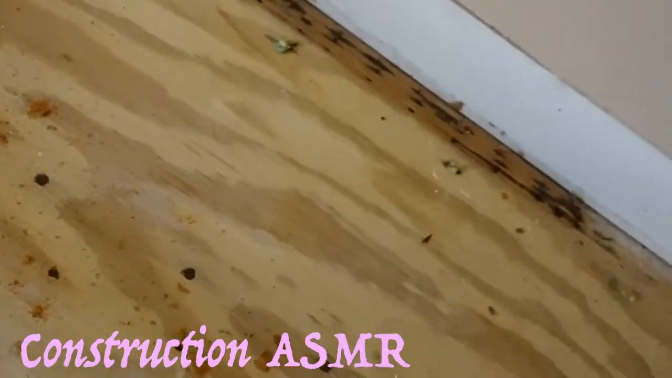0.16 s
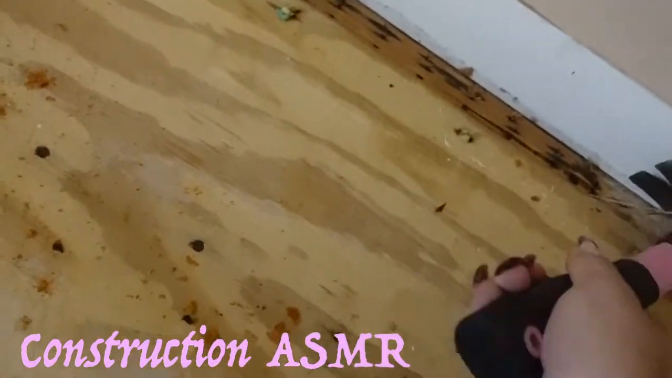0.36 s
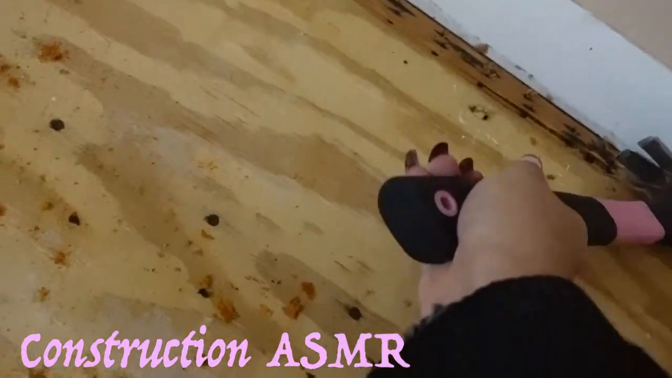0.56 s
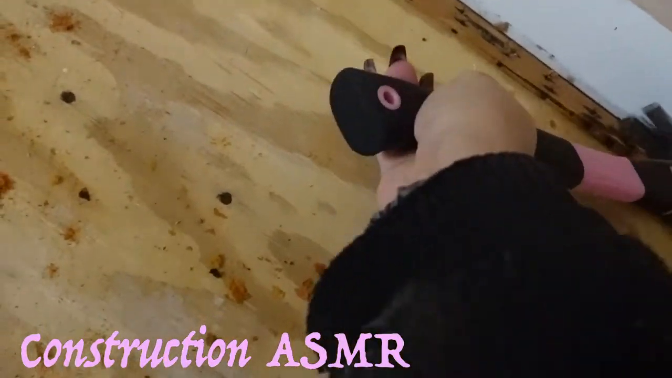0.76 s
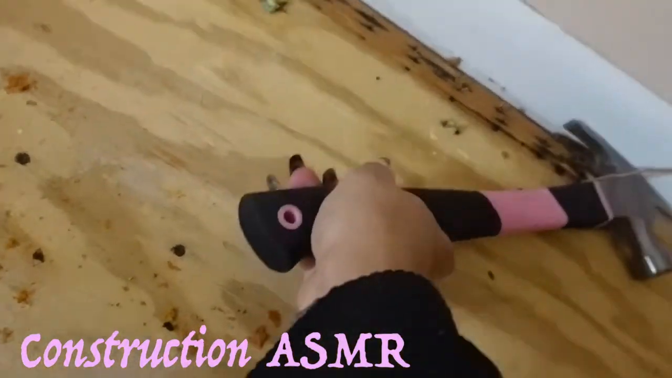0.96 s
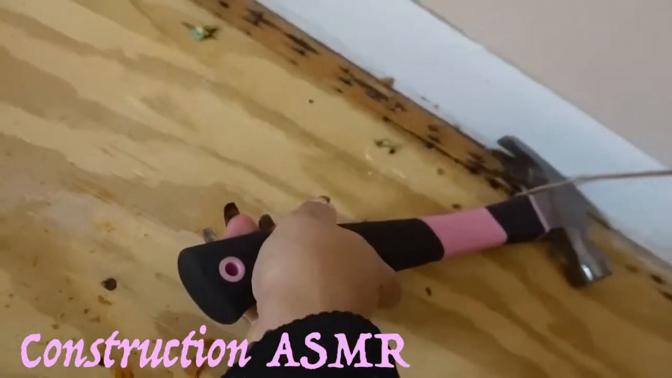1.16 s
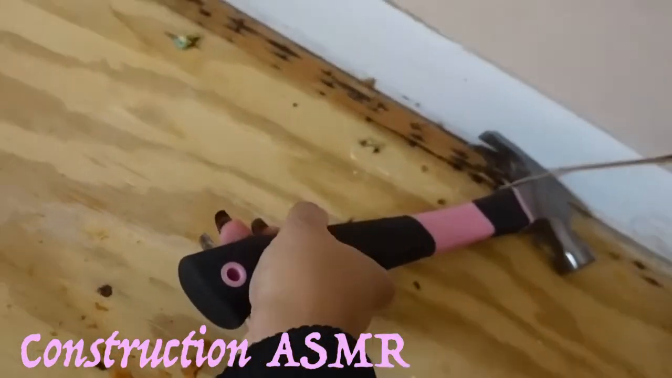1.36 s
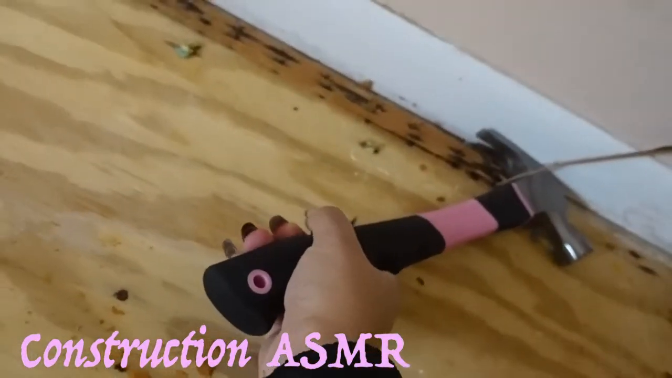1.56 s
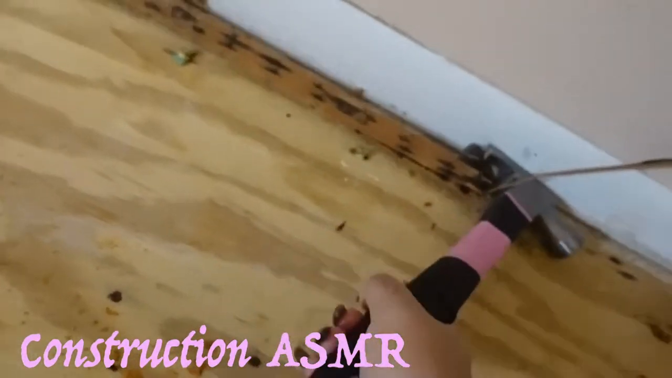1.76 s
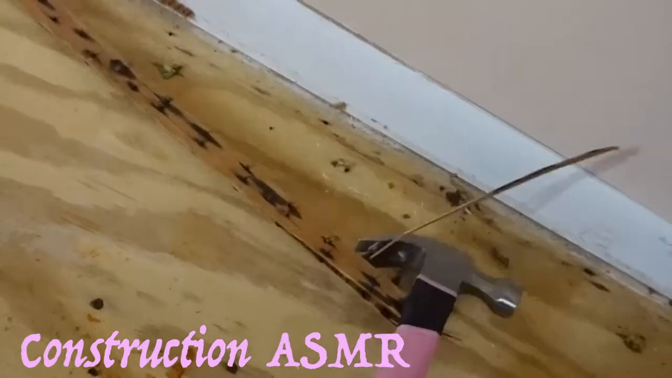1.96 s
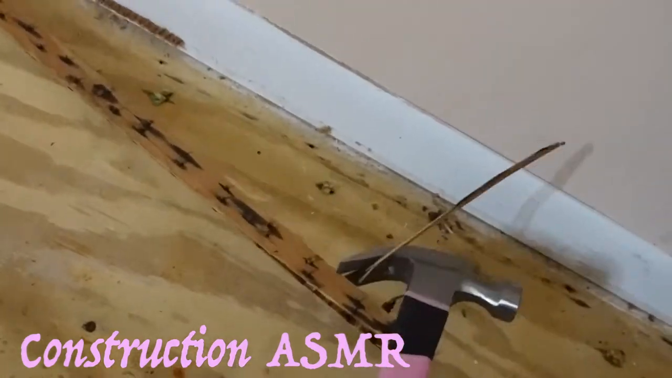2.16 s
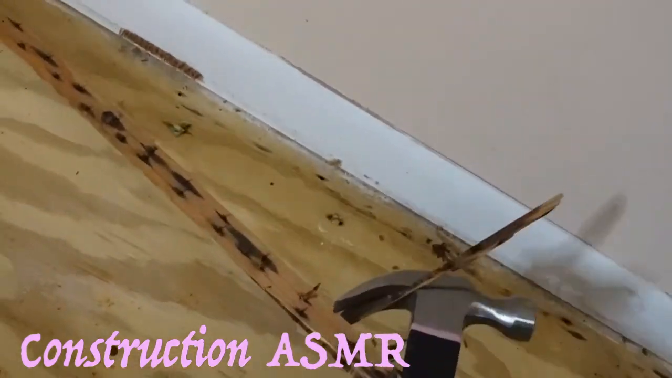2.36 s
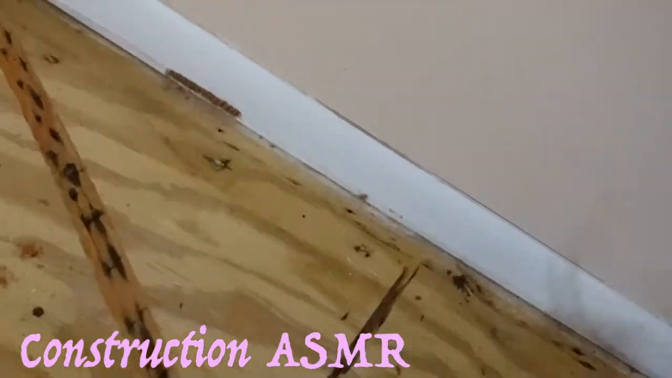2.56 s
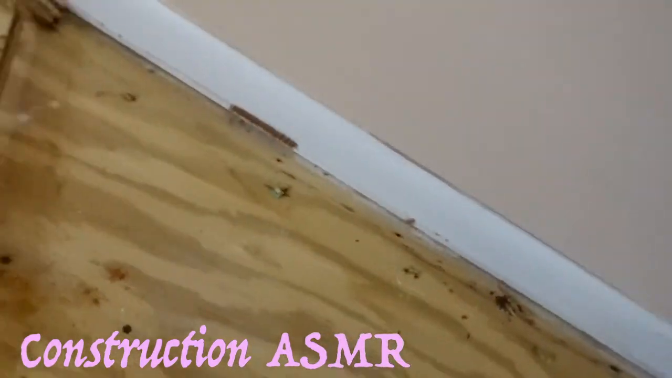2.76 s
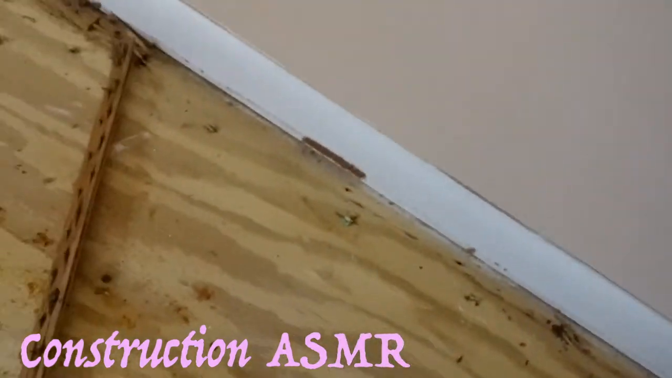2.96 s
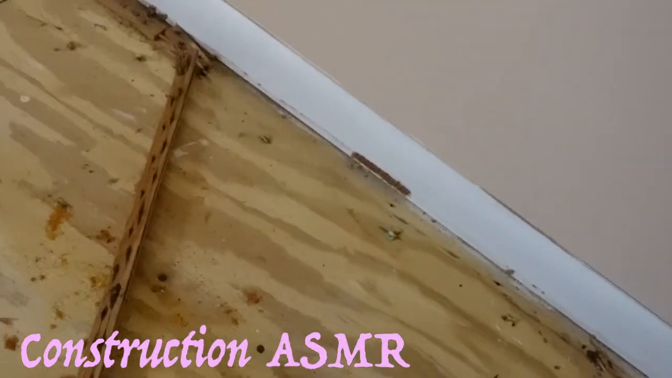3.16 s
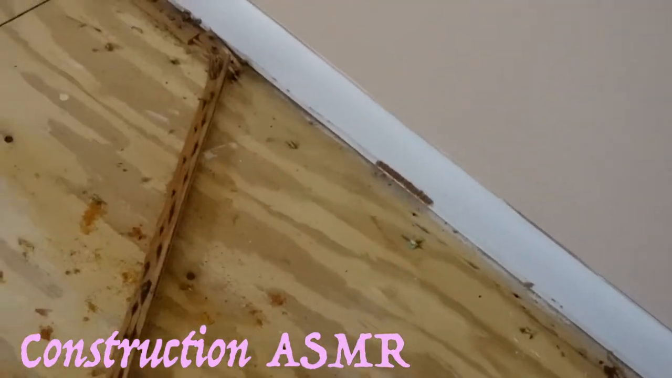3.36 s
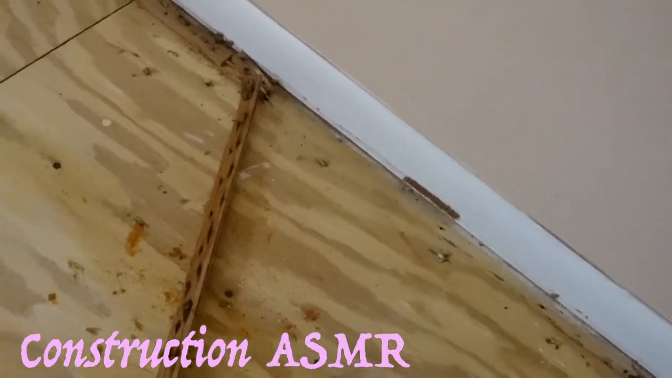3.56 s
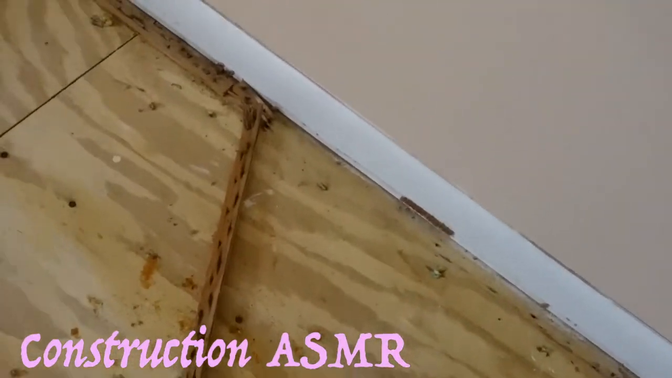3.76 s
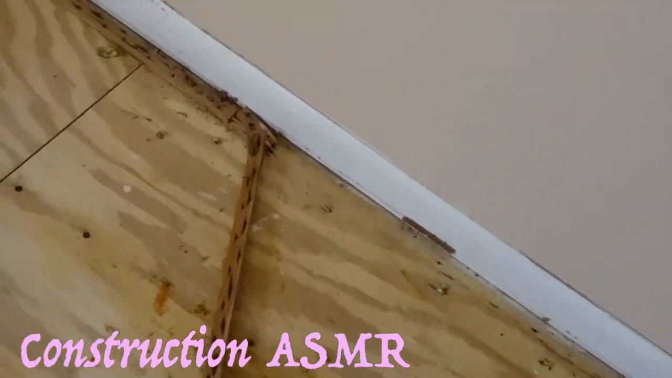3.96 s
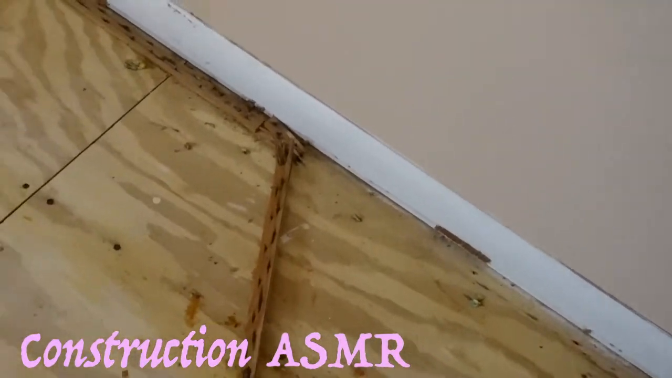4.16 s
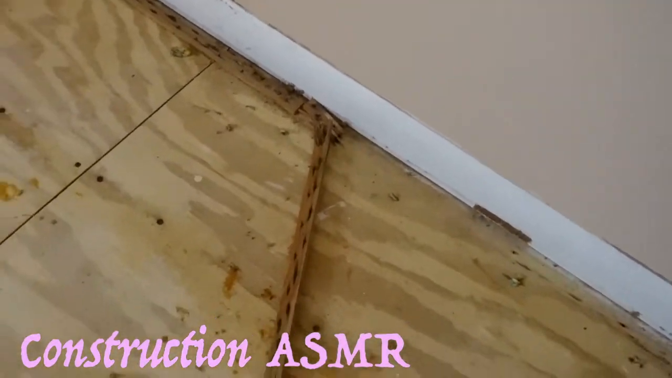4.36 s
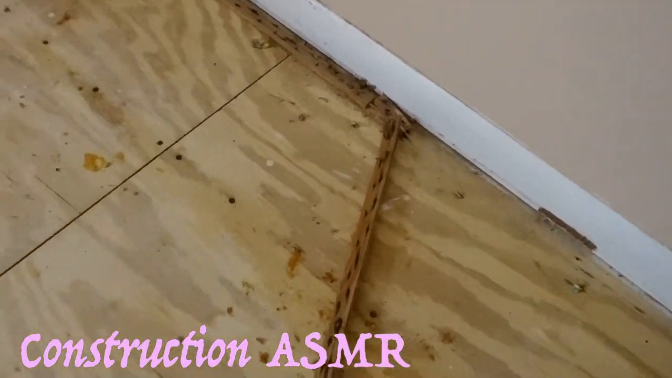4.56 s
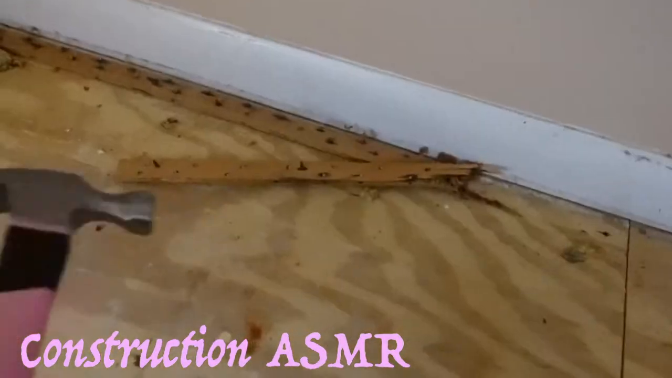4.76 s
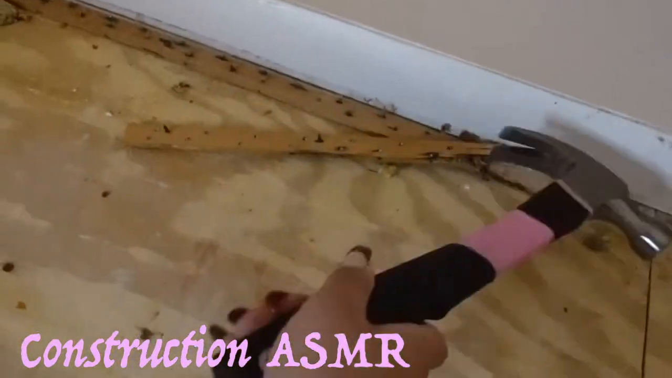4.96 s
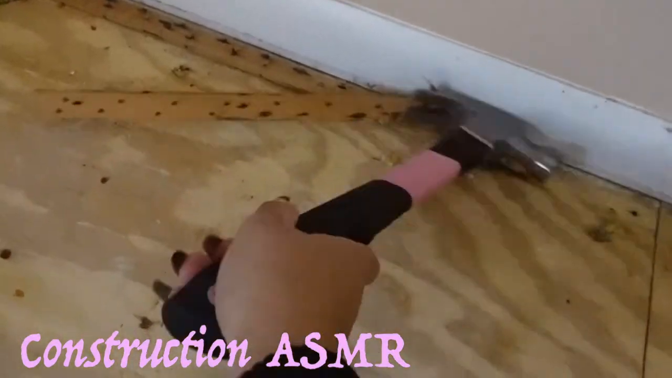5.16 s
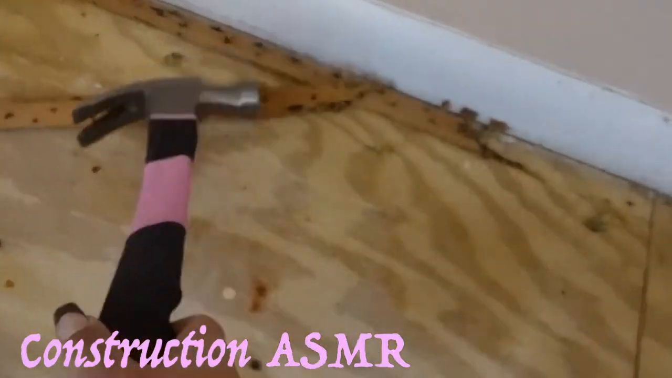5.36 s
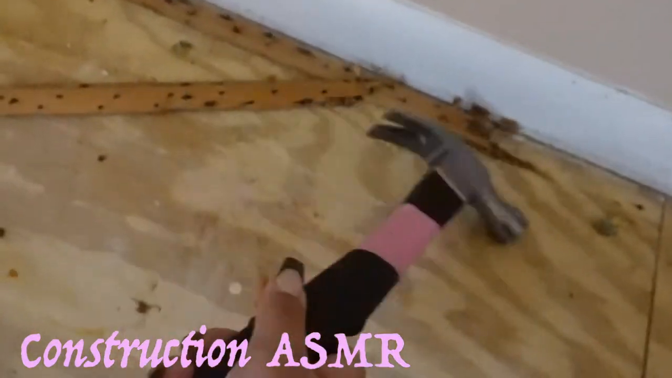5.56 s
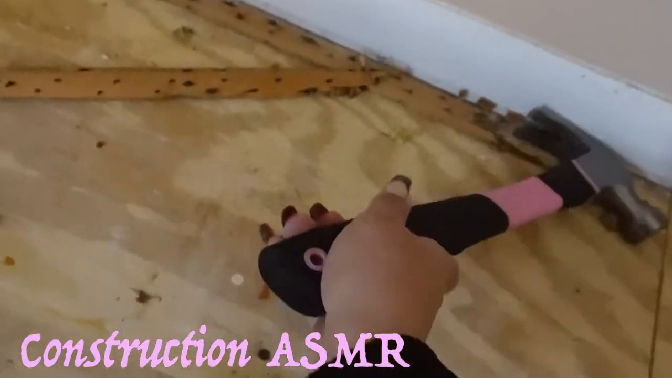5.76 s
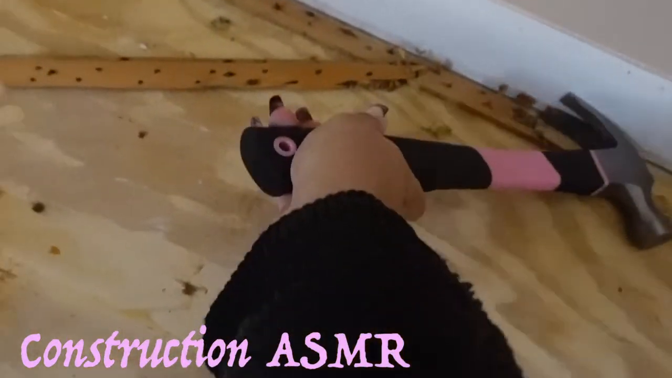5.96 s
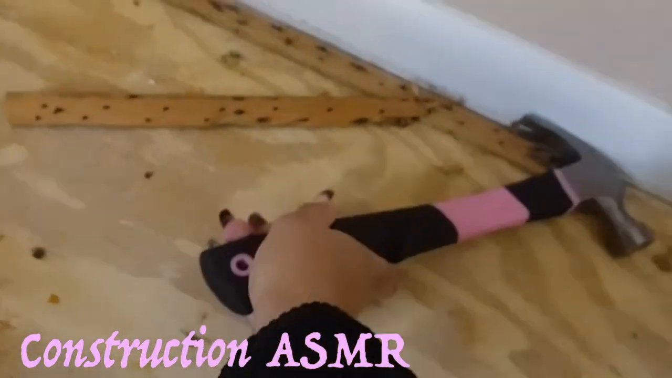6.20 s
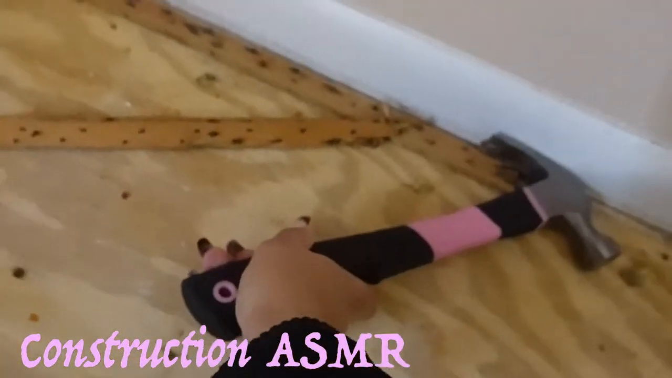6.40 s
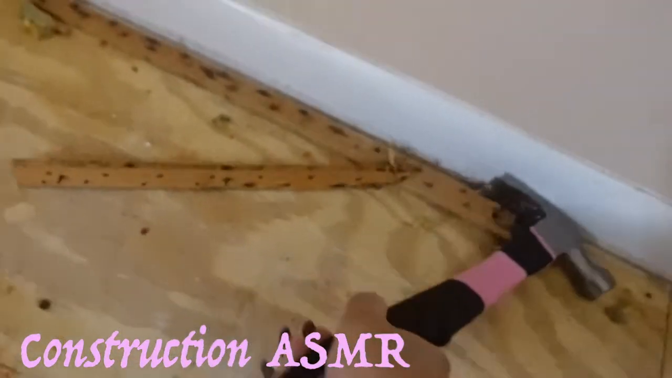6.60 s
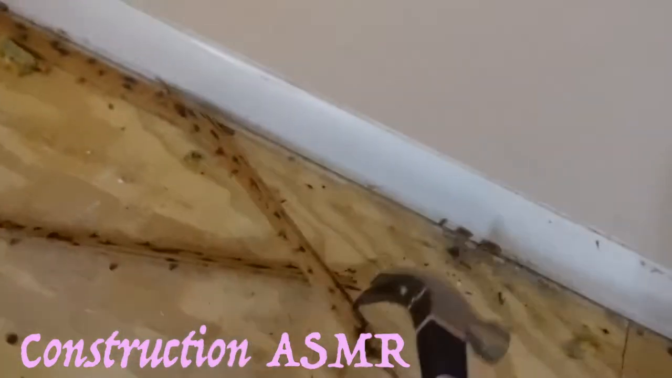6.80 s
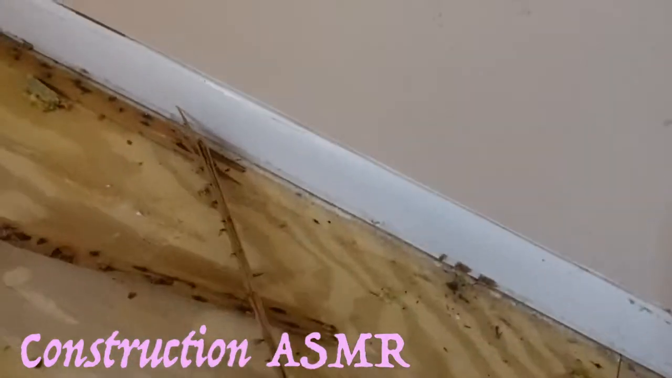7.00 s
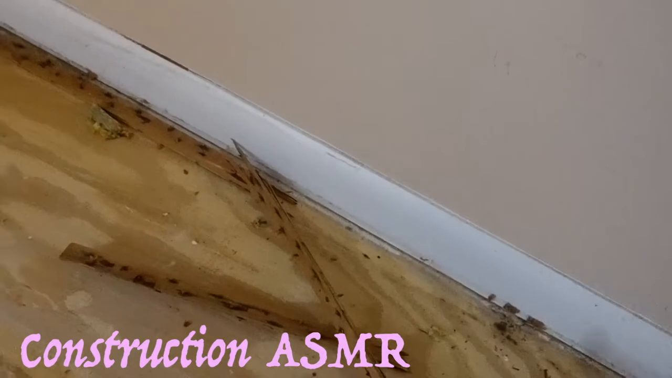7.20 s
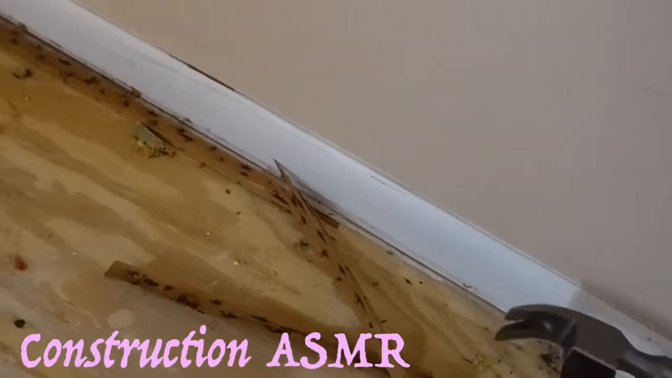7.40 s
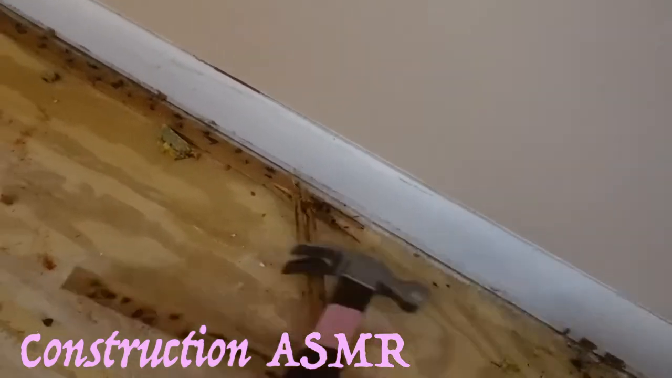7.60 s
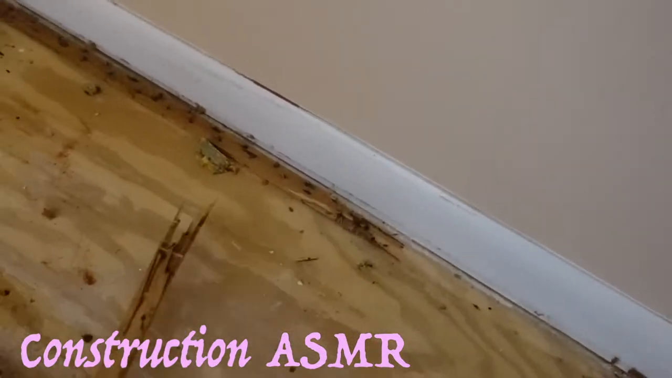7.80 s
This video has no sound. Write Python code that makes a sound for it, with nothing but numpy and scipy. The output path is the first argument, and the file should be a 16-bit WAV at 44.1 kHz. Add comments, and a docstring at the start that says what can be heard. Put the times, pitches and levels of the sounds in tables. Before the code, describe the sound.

A claw hammer knocks and pries a nailed wooden strip off a plywood floor, wood cracking, splintering and groaning in a bare room.

```python
"""Two faint clicks of parting wood fibre stand over a faint steady hiss; then the first blow meets the boards.
A claw hammer jammed under a nailed wooden strip levers it off a plywood floor, close to a phone.
Blows ring decaying board modes; fibres snap singly, then tear in dense random bursts filtered by the strip.
Steel and strip scrape along the floor, bent wood groans as narrow-band noise, and a low hum comes and goes.
The bare room answers with a short noise tail whose treble dies first."""
import sys
import numpy as np
from scipy import signal
from scipy.fft import rfft, irfft, next_fast_len
from scipy.io import wavfile
from scipy.ndimage import uniform_filter1d

SR = 44100
rng = np.random.default_rng(int(sys.argv[2]) if len(sys.argv) > 2 else 0)


def transcribe(signal):
    """Save signal, clipped to [-1, 1], as a 16-bit WAV file at the path in sys.argv[1]."""
    frames = np.atleast_2d(signal).T
    limited = np.clip(frames, -1, 1)
    pcm = np.round(limited * 32767).astype(np.int16)
    wavfile.write(sys.argv[1], SR, pcm)


N = 345744
# modes of the plywood boards: f/Hz, relative level/dB, t60/s
BOARD_MODES = [(62, -26, .15), (84, -26, 0.2), (128.5, -20, 0.47), (161.3, -5, 0.23), (197, -1, 0.13),
               (264, 1.5, 0.069), (307.5, 4, 0.086), (350, 7.5, 0.058), (420.6, 10, 0.03),
               (510.6, 6, 0.032), (609, 1, 0.052)]
# modes of the wooden strip and hammer head: f/Hz, relative level/dB, t60/s
STRIP_MODES = [(806, 1, 0.011), (1095, 3.5, 0.0071), (1259, -3, 0.021), (1440, 0.5, 0.0099),
               (1730, 2.5, 0.0078), (2038, -0.5, 0.011), (2288, 2.5, 0.0062), (2724, 5, 0.005),
               (3120, 0.5, 0.0081), (4205, 5.5, 0.0022), (5100, -65, 0.0027)]
OPPOSITE = np.array([[1], [-1]])  # a side signal enters the two channels in opposite sense


def undb(db):
    """Amplitude ratio of a level: twenty decibels to each factor of ten."""
    return 10 ** (np.asarray(db) / 20)


def unit(x):
    """Normalisation by effective value: scale to rms 1."""
    return x / np.sqrt(np.mean(x ** 2))


def colour(x, points):
    """Spectral shaping: weight by (f/Hz, level/dB) points joined on a log-frequency axis."""
    hz, db = np.transpose(points)
    size = next_fast_len(len(x))
    f = np.maximum(np.fft.rfftfreq(size, 1 / SR), 1)
    gain = undb(np.interp(np.log(f), np.log(hz), db))
    return irfft(rfft(x, size) * gain, size)[:len(x)]


def ring(modes, weight_db=0, phase=0):
    """Modal superposition: an impulse response is a sum of exponentially decaying sinusoids."""
    hz, db, t60 = np.transpose(modes)[:, :, None]
    t = np.arange(SR // 4) / SR
    decay = np.exp(-np.log(1000) * t / t60)
    waves = np.sin(2 * np.pi * hz * t + np.reshape(phase, (-1, 1))) * decay
    return np.sum(undb(db + np.reshape(weight_db, (-1, 1))) * waves, axis=0)


def add(track, s, sound, peak_db):
    """Linear superposition: mix a sound in at time s, scaled to its peak."""
    i = int(s * SR)
    sound = sound[:N - i]
    track[i:i + len(sound)] += sound * undb(peak_db) / np.max(np.abs(sound))


def grit(rate, spread_db):
    """Random impulse process: slips and breaks at chance moments, a few much larger than the rest."""
    hit = rng.random(N) < rate / SR
    size_db = spread_db * np.minimum(rng.exponential(size=N), 4.)
    return hit * rng.standard_normal(N) * undb(size_db)


def judder(rate, depth_db):
    """Random modulation: a gain glides between chance levels drawn `rate` times a second."""
    k = int(SR / rate)
    steps = np.repeat(rng.standard_normal(N // k + 1), k)
    return undb(depth_db * uniform_filter1d(steps, k)[:N])


def held(rows, rough, edge_s):
    """Narrow-band noise: uneven slips drive a resonance whose strength and phase wander in a band rough * f."""
    out = np.zeros(N)
    for start, end, hz0, hz1, db in rows:
        i = np.arange(int(start * SR), int(end * SR))
        k = int(SR / rough / hz0)
        slips = uniform_filter1d(uniform_filter1d(rng.standard_normal((2, len(i))), k), k)
        turn = 2 * np.pi * np.cumsum(np.linspace(hz0, hz1, len(i))) / SR
        edge = np.clip(np.minimum(i - i[0], i[-1] - i) / SR / edge_s, 0, 1)
        tone = unit(slips[0] * np.sin(turn) + slips[1] * np.cos(turn))
        out[i] += undb(db) * edge * tone
    return out


def prying():
    """Switched excitation: 1 while wood is torn, 0 while steel and strip only slide."""
    # spells of tearing: start t/s, end t/s
    spells = [(.95, 2.76), (5.1, 5.3), (6.25, 7.12)]
    t = np.arange(N) / SR
    return sum((t >= start) * (t < end) * 1. for start, end in spells)


def strokes(rest_db=-60, swell_db=30, sag_db_per_s=63, fade_db_per_s=263):
    """Exponential envelopes: each stroke's drive rises, tires while held, then dies; overlapping strokes add."""
    # tearing and scraping: start t/s, swell t/s, hold t/s, strip drive level/dB,
    # fine splinter level/dB re strip drive, board rumble level/dB re strip drive
    pulls = [(0.344, 0.0084, 0.0061, -16.5, -19.5, -4), (0.385, .01, 0.16, -18, -31, 3.5),
             (0.582, 0.0046, 0.03, -31.5, 2, 6.5), (0.702, 0.006, 0.057, -34, -10, 5),
             (0.743, 0.0097, .02, -18, -9.5, -3), (.805, .01, 0.032, -22.5, -5.5, -3),
             (0.994, 0.036, 0.14, -47, -1.5, 5), (1.389, 0.0026, 0.0069, -29, 0, -13),
             (1.421, 0.006, 0.065, -32.5, 2, -9.5), (1.542, 0.0096, 0.042, -41.5, 3, -21),
             (1.603, 0.0071, 0.081, -23.5, 2.5, -13.5), (1.645, .15, .03, -10.5, -9, -7.5),
             (1.837, 0.021, 0.21, -10, -16.5, -14), (2.116, 0.0032, 0.01, -27.5, -8.5, -31.5),
             (2.261, 0.004, 0.0092, -30.5, -3.5, -21), (2.323, 0.15, 0.022, -19, 1.5, -33),
             (2.483, 0.0057, 0.016, -20, -1.5, -13), (2.558, 0.014, 0.032, -25, 7, -20),
             (2.63, 0.0085, 0.079, -19.5, -5, -15.5), (2.734, 0.057, 0.12, -3.5, -21.5, -17.5),
             (3.018, 0.004, 0.019, -25.5, -6.5, -42), (3.289, 0.14, 0.11, -38, -2.5, -8),
             (3.745, 0.047, 0.029, -16, -0.5, -27), (3.876, .006, .04, -33.5, -20, -6),
             (4.031, 0.012, 0.13, -30.5, -22, 0), (4.282, .08, .1, -56.5, -9.5, -10),
             (4.669, .005, 0.048, -36.5, -38, -0.5), (5.107, 0.0055, 0.042, -20, -8, -1),
             (5.152, 0.0035, 0.0068, -16, -11, -8.5), (5.204, 0.057, 0.069, -17, -8, -1.5),
             (5.516, 0.0045, 0.005, -30.5, -8.5, 9.5), (5.62, 0.0079, 0.078, -25.5, -10, 1),
             (5.648, 0.031, .03, -21.5, -8.5, -5), (5.786, 0.009, 0.087, -9.5, -17, -2),
             (5.918, 0.062, .045, -23.5, -5.5, -4), (6.044, 0.011, 0.0093, -21.5, 3, -2),
             (6.13, 0.066, 0.015, -27.5, -8.5, -5.5), (6.277, 0.033, .15, -54.5, 6.5, 1.5),
             (6.5, 0.066, 0.25, -16, -3.5, -10.5), (6.754, 0.015, 0.087, -17, -1, -18),
             (6.896, .015, 0.08, -13.5, -10.5, -3), (6.997, 0.034, 0.06, -21.5, -12, -2),
             (7.29, .22, .055, -40, -27, -33), (7.572, 0.035, 0.022, -10, -6.5, -8.5),
             (7.626, 0.027, 0.04, -17, -1, -7), (7.7, 0.014, 0.12, -20.5, -5.5, -3)]
    t = np.arange(N) / SR
    # between strokes the hand only rests on the tool, and the boards are not driven
    out = np.outer(undb(rest_db) * np.array([1, 1, 0]), np.ones(N))
    for s, swell_s, hold_s, db, splinter_db, boards_db in pulls:
        i = slice(int(s * SR), int((s + swell_s + hold_s + .3) * SR))
        since = t[i] - s - swell_s
        rise = swell_db * since / swell_s
        sag = sag_db_per_s * np.minimum(since, hold_s)
        fade = fade_db_per_s * np.maximum(since - hold_s, 0)
        shape = np.where(since < 0, rise, -sag - fade)
        out[:, i] += np.outer(undb([0, splinter_db, boards_db]), undb(db + shape))
    return out


def tearing(gains, spread_oct=1.0):
    """Source-filter principle: dense random breaks excite strip and boards and crackle in the air."""
    # splinter noise: f/Hz, relative spectral level/dB
    splinter_spectrum = [(1470, -34), (2500, 5.5), (2970, 10), (4910, 8.5), (5830, 8), (6350, 6),
                         (14800, -3), (16000, 3)]
    lively_hz, lively_db_per_oct = 2315, 39  # the more splinters fly, the higher the strip speaks
    slide_rough, slide_top_hz = .4, 7000  # sliding is smoother than tearing, and duller

    # the steel catches and lets go, so the force comes in uneven lumps
    force, splinter, rumble = judder(70, 3.1) * gains
    centre_hz = lively_hz * 2 ** (20 * np.log10(splinter / force) / lively_db_per_oct)
    torn = prying()
    rough = slide_rough + (1 - slide_rough) * torn

    breaks = grit(3000, 2.82 * rough) * force
    strip = 0
    for k, mode in enumerate(STRIP_MODES):
        # the free length of strip changes, and with it the modes that speak
        share = undb(-6 * (np.log2(mode[0] / centre_hz) / spread_oct) ** 2)
        tone = signal.oaconvolve(breaks * share, ring([mode])[:SR // 20])[:N]
        strip = strip + (-1) ** k * tone  # neighbours move in opposite sense

    splinters = unit(colour(grit(5000, 3.14 * rough), splinter_spectrum)) * splinter
    dull = signal.sosfilt(signal.butter(1, slide_top_hz, fs=SR, output="sos"), splinters)
    splinters = torn * splinters + (1 - torn) * dull

    shaking = grit(3000, 2.37) * rumble * undb(-31)
    boards = signal.oaconvolve(shaking, ring(BOARD_MODES))[:N]
    return undb(-14.5) * strip + splinters + boards


def snaps(rows, bounce_db=-7, body_db=-14):
    """Impulsive release: a fibre clicks, its stub rings, the floor reflects both and the strip is jolted."""
    out, t = np.zeros(N), np.arange(SR // 60) / SR
    click_s, ring_s, body_s = .00045, .0005, .0074  # time constants
    crisp = signal.butter(2, 4500, "high", fs=SR, output="sos")
    # neighbouring modes in opposite sense
    body = ring(STRIP_MODES, phase=np.pi * np.arange(len(STRIP_MODES)))[:len(t)] * np.exp(-t / body_s)
    for s, peak_db, hz, click_db in rows:
        click = rng.standard_normal(len(t)) * np.exp(-t / click_s)
        stub = np.convolve(click, np.sin(2 * np.pi * hz * t) * np.exp(-t / ring_s))[:len(t)]
        jolt = np.convolve(click, body)[:len(t)]
        bounce_s = rng.uniform(.001674, .002754)
        for lag, db in (0, 0), (bounce_s, bounce_db):
            add(out, s + lag, stub, peak_db + db + 1.5)
            add(out, s + lag, signal.sosfilt(crisp, click), peak_db + db + click_db + 3.5)
        # thick fibres ring low and move the strip more
        add(out, s, jolt, peak_db + body_db - 6 * np.log2(hz / 3000))
    return out


def single_fibres():
    """Isolated impulsive releases: single fibres snap at set moments."""
    # fibres: t/s, peak level/dB before a common offset, stub ring f/Hz,
    # sharp click level/dB re peak before a common offset
    fibres = [(0.062, -38, 3030, 8), (0.0995, -27, 8900, 6), (0.3381, -23, 8900, -8),
              (0.3491, -12.5, 2970, 8.5), (0.4277, -17, 2720, -10), (0.4949, -24.5, 2040, 7.5),
              (0.634, -19.5, 2920, -1), (0.7038, -18.5, 3020, 0), (0.7223, -10.5, 2776, -27),
              (0.876, -21.5, 3250, 8.5), (1.0445, -24, 4370, 3), (1.0685, -16.5, 5740, 3),
              (1.0994, -15, 4300, 3), (1.1638, -28.5, 5730, -12), (1.1897, -20.5, 4800, 2),
              (1.2008, -19, 5320, -4), (1.2176, -20.5, 4800, -4), (1.2735, -16.5, 4950, 5.5),
              (1.2925, -18, 5480, 4.5), (1.3364, -21.5, 5240, 5.5), (1.3713, -16, 5260, 4.5),
              (1.3962, -4, 5530, 3.5), (1.4691, -6.5, 3074, -2), (1.5658, -13.5, 5760, 1),
              (1.5833, -14.5, 9500, -6), (1.5963, -0.5, 4764, -11.5), (1.61, -4, 5043, -9),
              (1.6741, -6, 4880, -13), (1.6975, -8.5, 1999, 1), (1.7145, 1.5, 2950, -11),
              (1.7444, 5, 5020, -5), (1.8813, -3, 3600, -12.5), (1.92, -6, 1920, -1.5),
              (1.9309, 2.5, 2070, 4.5), (1.9694, -1.5, 2075, -3.5), (2.1271, -7, 2200, 5),
              (2.2348, -3, 3220, -0.5), (2.2951, -17, 2003, -8), (2.3109, -16, 4500, 7),
              (2.3341, -10.5, 5610, 1), (2.3511, -10, 6480, -8), (2.3733, -3, 10970, 3),
              (2.38, -2, 5440, 3), (2.3881, -2, 5300, 1.5), (2.4004, -18, 5180, 6.5),
              (2.4164, 2, 7470, 10.5), (2.5167, -7.5, 2980, 6.5), (2.5669, -4, 6755, -9),
              (2.6159, -1, 8715, -1), (2.7519, 3.5, 2346, -8.5), (2.8604, -5, 2520, -16),
              (2.8824, -8, 2170, -18), (2.9094, -17, 2016, -13), (2.9467, -6.5, 4400, -2),
              (3.037, -14.5, 2270, -8), (3.0962, -19, 2070, -9), (3.344, -29.5, 5170, -17.5),
              (4.0442, -22, 2610, -18.5), (5.1068, -19.5, 2890, -7), (5.1208, -11, 4970, -0.5),
              (5.2327, -0.5, 7460, -9), (5.253, -3.5, 2750, 1.5), (5.5243, -13.5, 2160, -7),
              (5.7728, -5, 2020, -18), (6.0771, -6.5, 4230, -4), (6.1809, -11, 2740, -7),
              (6.4079, -27, 5430, -7.5), (6.4146, -26, 9970, -9), (6.4501, -30, 4160, 1),
              (6.5041, -19, 2734, 0.5), (6.5157, -21, 2583, -1.5), (6.5351, -22.5, 10180, 9.5),
              (6.5445, -7, 9920, -4.5), (6.5522, -8, 5330, 5.5), (6.5874, -12, 4060, 1),
              (6.6732, 4.5, 2860, -5.5), (6.7496, -2.5, 3940, 3), (6.8753, 5.5, 6140, -2.5),
              (7.013, 1.5, 5130, -3.5), (7.0764, -12, 3300, -21.5), (7.5797, -13.5, 2330, -13),
              (7.7972, -11, 3460, -2), (7.8251, -4.5, 2250, -24)]
    return snaps(fibres)


def crackle(splinter, strip, count=220):
    """Inhomogeneous random process: small snaps crowd where splinters are loud, less where strip drive is louder."""
    peak_db, spread_db = 13, 1  # re splinter drive
    centre_hz, spread_oct = 5840, 0.59
    density = prying() * splinter ** 0.48 * np.minimum(splinter / strip, 1) ** 0.55
    chance = np.cumsum(density)
    at = np.searchsorted(chance, rng.random(count) * chance[-1])
    size, pitch, sharp = rng.standard_normal((count, 3)).T
    level_db = 20 * np.log10(splinter[at]) + peak_db + spread_db * size
    hz = np.clip(centre_hz * 2 ** (spread_oct * pitch), 2000, 11000)
    return snaps(list(zip(at / SR, level_db, hz, -3 + 5 * sharp)))


def knocks(spread_oct=0.25, tick_s=0.0061, skid_s=0.0066):
    """Modal excitation: a blow rings the board modes nearest its own pitch, with a woody tick at contact."""
    # blows: t/s, first-contact tick peak level/dB before a common offset,
    # thud centre f/Hz, thud peak level/dB before a common offset
    blows = [(0.349, -7, 140, -24), (0.407, -2, 555, -11), (0.43, -28, 365, -8), (0.586, -22, 360, -14),
             (0.723, 1, 193, -15.5), (1.055, -29, 186, -22), (1.674, -21.5, 274.7, -21),
             (1.801, 4, 230, -14.5), (1.825, -1, 193.3, -14), (2.774, 6, 231, -42),
             (3.857, -12.5, 479, -28), (4.044, -14, 119.5, -19), (4.351, -32, 123, -31.5),
             (4.681, -26.5, 342, -53.5), (5.106, -12.5, 252.6, -11.5), (5.154, -13, 153, -15.5),
             (5.206, 4, 168.5, -14.5), (5.231, -2, 147.5, -20), (5.525, -15, 344, -12),
             (5.626, -11.5, 300, -9.5), (5.774, 5.5, 176, -18), (5.799, -11, 150, -13.5),
             (6.057, -6.5, 321, -17), (6.103, -30, 205, -23.5), (6.89, 4, 325, -7.5), (6.924, 2, 365, -12),
             (6.96, -8, 332, -13), (7.58, -0.5, 310, -11.5), (7.7, -4.5, 327, -17.5),
             (7.826, 1.5, 322, -27)]
    out, hz, t = np.zeros(N), np.array(BOARD_MODES)[:, 0], np.arange(SR // 40) / SR
    push = np.hanning(SR // 500)  # the head stays on the wood for a moment
    woody = ring(STRIP_MODES)[:len(t)] * np.exp(-t / tick_s)
    for s, tick_db, centre_hz, thud_db in blows:
        nearness_db = -6 * (np.log2(hz / centre_hz) / spread_oct) ** 2
        weight_db = nearness_db + 2 * rng.standard_normal(len(hz))
        add(out, s, np.convolve(ring(BOARD_MODES, weight_db), push), thud_db + 4.0)
        skid = rng.standard_normal(len(t)) * np.exp(-t / skid_s)
        add(out, s, np.convolve(skid, woody), tick_db - 7.0)
    return out


def groans():
    """Friction-driven resonance: bent wood groans on rough gliding pitches."""
    # groans: start t/s, end t/s, start f/Hz, end f/Hz, rms level/dB before edge fades
    bends = [(.26, .345, 640, 620, -51.5), (1.4, 1.52, 1667, 1695, -44.5), (1.675, 1.76, 1017, 1010, -23),
             (1.86, 2.05, 738, 714, -25.5), (1.89, 1.94, 1917, 1950, -24.5), (5.16, 5.185, 1450, 1516, -17),
             (5.8, 5.885, 1970, 2094, -19.5), (5.96, 6.045, 850, 858, -36.5),
             (5.96, 6.04, 3180, 3250, -31.5), (6.055, 6.09, 810, 987, -27), (6.89, 7.01, 330.7, 321, -21),
             (6.9, 7.1, 642, 620, -29)]
    return held(bends, .2, .012)


def hums():
    """Narrow-band noise at low frequency: a low hum comes and goes."""
    # hums: start t/s, end t/s, start f/Hz, end f/Hz, rms level/dB before edge fades
    spells = [(4.4, 4.62, 77, 76, -44), (4.68, 5.1, 60, 61, -45), (4.9, 5.1, 126.4, 135, -53.5),
              (7.25, 7.58, 108.6, 112, -56.5)]
    return held(spells, 0.42, 0.024)


def room(dry, first_echo_s=0.0063, wet_db=-12.5, side_db=-19):
    """Reverberant decay: bare walls give a noise tail, slightly different at the two microphones."""
    # decay of the bare room: f/Hz, t60/s
    decay_times = [(100, 0.34), (400, 0.67), (1500, 0.69), (4000, 0.39), (12000, 0.25)]
    t, (hz, t60) = np.arange(SR * 3 // 4) / SR, np.transpose(decay_times)
    tails = np.zeros((2, len(t)))
    for centre in 62.5 * 2. ** np.arange(9):  # octave bands, Hz
        octave = [(centre / 2, -40), (centre / 2 ** .5, -3), (centre, 0),
                  (centre * 2 ** .5, -3), (centre * 2, -40)]
        decay = np.exp(-np.log(1000) * t / np.interp(np.log(centre), np.log(hz), t60))
        tails += [colour(rng.standard_normal(len(t)), octave) * decay for _ in range(2)]
    tails *= np.clip(t / first_echo_s - 1, 0, 1)  # silent before the first echo, then rising
    mid, side = (signal.oaconvolve(dry, tail)[:N] / np.sqrt(np.sum(tail ** 2)) for tail in tails)
    return undb(wet_db) * (mid + undb(side_db) * side * OPPOSITE)


def hiss(level_db=-52, side_db=-8.5):
    """Stationary coloured noise: steady air and microphone noise, wavering a little."""
    # noise floor: f/Hz, relative spectral level/dB
    spectrum = [(18, -41.5), (30, -34), (100, -3.5), (364, -11.5), (616, -6.5), (962, -14), (1670, -7.5),
                (1910, -10.5), (2060, -9), (6000, -21.5), (16000, -31)]
    mid, side = (unit(colour(rng.standard_normal(N), spectrum)) for _ in range(2))
    return undb(level_db) * judder(3.41, 0.35) * (mid + undb(side_db) * side * OPPOSITE)


def scene(pan_db=1.12, aside_hz=600):
    """Level-difference stereo: the work lies in front of the phone; only its treble wanders to either side."""
    gains = strokes()
    strip, splinter, _ = gains
    work = tearing(gains) + single_fibres() + crackle(splinter, strip) + knocks() + groans()
    treble = signal.sosfilt(signal.butter(1, aside_hz, "high", fs=SR, output="sos"), work)
    aside = treble * (judder(77, pan_db) - 1)
    return work + aside * OPPOSITE + room(work) + hiss() + hums()


def record(dry, bass_hz=100, top_hz=15900):
    """Band-limiting and soft saturation: the phone loses deep bass, rounds loud peaks and cuts the top."""
    ceiling = .66  # re full scale
    thin = signal.sosfilt(signal.butter(4, bass_hz, "high", fs=SR, output="sos"), dry)
    rounded = ceiling * np.tanh(thin / ceiling)
    return signal.sosfilt(signal.ellip(10, .2, 95, top_hz, fs=SR, output="sos"), rounded)


dry = scene()
out = record(dry)
transcribe(out)
```